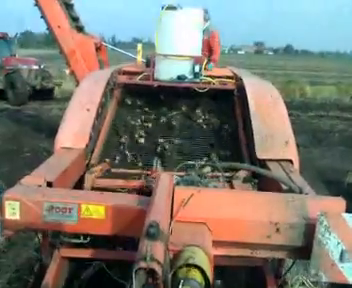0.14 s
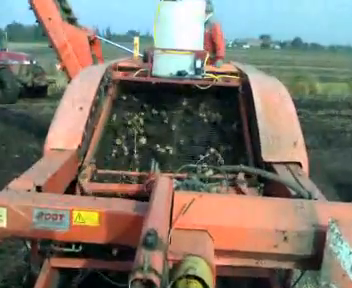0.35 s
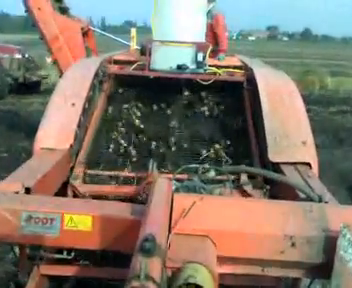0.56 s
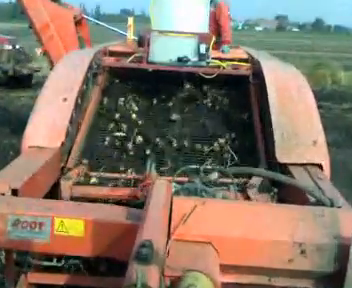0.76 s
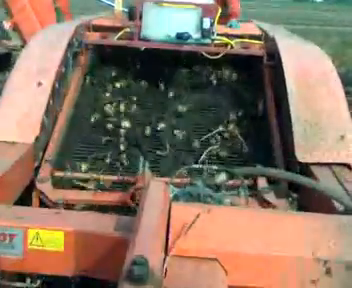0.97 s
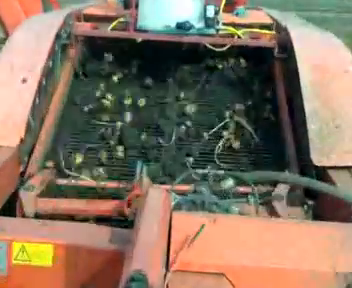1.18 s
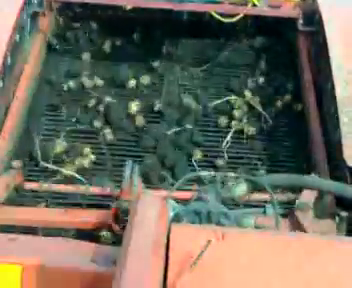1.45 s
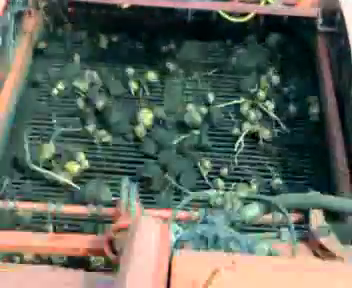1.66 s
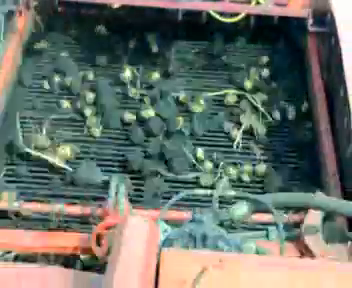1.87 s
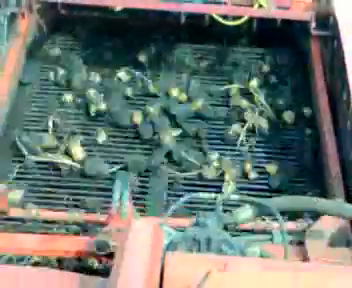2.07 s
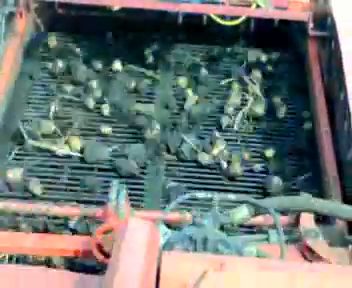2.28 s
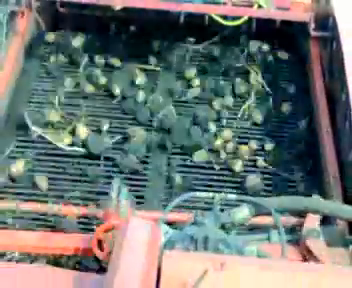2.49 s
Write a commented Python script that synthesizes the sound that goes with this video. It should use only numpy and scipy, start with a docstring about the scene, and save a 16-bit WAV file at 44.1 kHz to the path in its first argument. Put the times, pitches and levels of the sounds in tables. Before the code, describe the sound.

A six-cylinder diesel tractor drones loudly at a steady low pitch, with potato harvester roar, ringing panels, irregular metallic rattles and a few tiny stone ticks; open field, dry, close, dull slightly overloaded microphone.

```python
"""Diesel tractor pulling a potato harvester

Heard from the tractor on an open field: a six-cylinder engine hums at the firing rate, summed from cosines.
A geared tone beats slowly against its octave, and weaker cosines give uneven firing and a faint gear whine.
The machinery roars (noise bands), panels ring (resonated noise), a loose steel part rattles in bursts
(random knocks into modes) and stones tick on the web (a few touches into modes)."""
import sys
import numpy as np
from scipy import signal
from scipy.io import wavfile

SR = 44100
rng = np.random.default_rng(int(sys.argv[2]) if len(sys.argv) > 2 else 0)


def unload_wav(signal):
    """Save mono or channel-first audio to the path in sys.argv[1] as 16-bit WAV at rate SR, clipped to [-1, 1]."""
    wavfile.write(
        sys.argv[1],
        SR,
        np.round(np.clip(np.atleast_2d(signal).T, -1, 1) * 32767).astype(np.int16),
    )


N = 115542


def from_db(db):
    """Decibels to gain."""
    return 10 ** (np.asarray(db) / 20)


def rms_one(x):
    """Scale to unit rms."""
    return x / np.sqrt(np.mean(x ** 2) + 1e-20)


def in_time(rows):
    """Interpolate a (seconds, value) curve to one value per sample."""
    seconds, value = np.transpose(rows)
    return np.interp(np.arange(N) / SR, seconds, value)


def drift(corner_hz):
    """Slow random curve of unit spread: noise through a two-pole lowpass, made at every 40th sample."""
    step, settle = 40, 2000
    pole = np.exp(-2 * np.pi * corner_hz * step / SR)
    noise = rng.standard_normal(N // step + settle + 2)
    slow = signal.lfilter([1], [1, -2 * pole, pole * pole], noise)[settle:]
    return np.interp(np.arange(N) / step, np.arange(len(slow)), rms_one(slow - slow.mean()))


def ring(clicks, modes):
    """Clicks excite parallel two-pole modes, each a decaying sine."""
    out = 0
    for hz, db, t60_s in modes:
        pole = from_db(-60 / (t60_s * SR))
        w = 2 * np.pi * hz / SR
        feedback = [1, -2 * pole * np.cos(w), pole * pole]
        out = out + signal.lfilter([0, from_db(db) * np.sin(w)], feedback, clicks + 1e-18)
    return out


# Engine speed. Each row: time in seconds, firings per second.
FIRING_RATE = [(0, 80.1), (.35, 80.28), (.9, 80.03), (1.3, 80.42), (1.8, 80.35), (2.1, 79.9), (2.4, 79.3),
               (2.62, 79.6)]
CYLINDERS, FIRST_FIRING_S = 6, .005


def engine_cycle():
    """Engine phase in radians: the integrated firing rate over the cylinder count."""
    firings = np.cumsum(in_time(FIRING_RATE)) / SR - FIRST_FIRING_S * FIRING_RATE[0][1]
    return 2 * np.pi * firings / CYLINDERS


# Firing tone. Each row: time in seconds, rms level in dB.
HUM_LEVEL = [(0.05, -13), (0.2, -14.5), (0.37, -12), (0.84, -15.5), (1.46, -10.5), (1.54, -15.5),
             (1.6, -11.5), (1.82, -16), (1.96, -13), (2.03, -18), (2.19, -13), (2.55, -17)]
OCTAVE_DB, GEARED_DB = -18, -22
GEARED_ORDER, GEARED_IN_STEP_S = 12.18, .38  # order: multiple of the engine cycle


def exhaust(cycle):
    """Firing tone, its octave in antiphase to sharpen troughs, and a geared tone beating with the octave."""
    firing = CYLINDERS * cycle
    hum = from_db(in_time(HUM_LEVEL)) * np.cos(firing)
    gap = (GEARED_ORDER - 2 * CYLINDERS) * (cycle - cycle[int(GEARED_IN_STEP_S * SR)])
    octave = from_db(OCTAVE_DB) * np.cos(2 * firing)
    geared = from_db(GEARED_DB) * np.cos(2 * firing + gap)
    return np.sqrt(2) * (hum - octave - geared)


# Low tones from uneven cylinders. Each row: multiple of the engine cycle, mean level in dB.
UNEVEN_FIRING = [(3, -33), (7, -26.5), (9, -36), (11, -42), (13, -42), (15, -41)]
# Weaker engine and driveline tones. Each row: multiple of the engine cycle, mean level in dB.
DRIVELINE_TONES = [(16, -46.5), (18, -42.5), (19, -41.5), (20, -35.5), (22, -36), (23, -33.5), (24, -57),
                   (29, -35.5), (31, -44), (32, -30), (34, -33), (35, -43), (38, -40.5), (43, -39.5),
                   (44, -43), (46, -35), (47, -44.5), (53, -58), (57, -46.5), (58, -51), (60, -48.5),
                   (64, -40), (78, -43.5), (93, -37.5), (96, -38)]
# Gear whine tones, some between whole multiples of the engine cycle.
# Each row: multiple of the engine cycle, mean level in dB.
GEAR_WHINE = [(41.5, -35.5), (104.75, -38), (114, -51.5), (132.5, -43)]
TONE_WAVER_DB, TONE_WANDER_RAD = 2, .25


def driveline(cycle):
    """Weaker tones that follow the engine cycle, each wavering in level and phase."""
    out = 0
    for order, db in UNEVEN_FIRING + DRIVELINE_TONES + GEAR_WHINE:
        level = from_db(db + TONE_WAVER_DB * drift(2.22))
        phase = rng.uniform(0, 2 * np.pi) + TONE_WANDER_RAD * drift(3.3)
        out = out + np.sqrt(2) * level * np.cos(order * cycle + phase)
    return out


# Machinery roar spectrum. Each row: frequency in Hz, relative density in dB per Hz.
ROAR_SPECTRUM = [(20, -13.5), (30, -19.5), (48, -18), (62, -15.5), (108, -16), (125, -7.5), (160, -8),
                 (215, -17), (285, -15), (347, -21.5), (433, -15.5), (674, -18.5), (1100, -22), (1300, -19),
                 (1630, -27), (2500, -32), (3600, -36.5), (4500, -45), (5500, -41), (6200, -54),
                 (7300, -64.5)]
ROAR_DB, ROAR_PATCHY_DB = -20.5, 0.78
ROAR_FIRING_DB = -1.2  # negative: loudest in the troughs of the firing cosine


def roar(cycle):
    """Quarter-octave noise bands flicker partly together; those above 1 kHz puff with each firing."""
    together = drift(6)
    edges_hz = 18 * 2 ** np.arange(0, 9, 1 / 4)
    white = rng.standard_normal((2, N + SR))  # neighbouring bands take different noise
    at_hz, density_db = np.transpose(ROAR_SPECTRUM)
    puff_db = ROAR_FIRING_DB * np.cos(CYLINDERS * cycle)
    out = 0
    for k, (low, high) in enumerate(zip(edges_hz, edges_hz[1:])):
        bandpass = signal.butter(2, [low, high], "band", fs=SR, output="sos")
        band = signal.sosfilt(bandpass, white[k % 2])[SR:]
        level_db = np.interp(np.log(low * high) / 2, np.log(at_hz), density_db)
        flicker_db = ROAR_PATCHY_DB * (0.45 * together + drift(12))
        out = out + band * from_db(level_db + flicker_db + puff_db * (low > 1000))
    return from_db(ROAR_DB) * rms_one(out)


# Ringing panels. Each row: frequency in Hz, width in Hz, mean level in dB.
PANEL_MODES = [(100, 10, -27), (288.5, 17, -38.5), (462, 16, -40.5), (612, 35, -38.5), (763.6, 17, -35.5),
               (1286, 26, -38.5), (1353, 87, -40), (1481, 30, -40.5), (1760, 21, -43)]
PANEL_CLATTER_DB = 2.5


def panels():
    """Ringing panels: noise through narrow two-pole resonances, each drifting in level."""
    white = rng.standard_normal(N + SR)
    out = 0
    for hz, width_hz, db in PANEL_MODES:
        pole = np.exp(-np.pi * width_hz / SR)
        feedback = [1, -2 * pole * np.cos(2 * np.pi * hz / SR), pole * pole]
        ringing = signal.lfilter([1, 0, -1], feedback, white)[SR:]
        out = out + from_db(db + PANEL_CLATTER_DB * drift(7.5)) * rms_one(ringing)
    return out


# Rattle bursts of the loose part. Each row: time in seconds, level in dB.
RATTLE_LEVEL = [(0.0, -29), (0.03, -47), (0.17, -45), (0.2, -36), (0.23, -35), (0.29, -49), (0.34, -37.5),
                (0.36, -47), (0.64, -47), (0.69, -34.5), (0.74, -44), (0.85, -73), (0.97, -42), (1.06, -50),
                (1.1, -37), (1.12, -50), (1.34, -43), (1.41, -39), (1.47, -48), (1.52, -33.5), (1.55, -46),
                (1.77, -45), (1.8, -53), (1.9, -35.5), (1.95, -42), (1.99, -32.5), (2.02, -41), (2.05, -34),
                (2.08, -45), (2.12, -38), (2.14, -48), (2.18, -42), (2.22, -47), (2.25, -41), (2.3, -43),
                (2.33, -33.5), (2.41, -51), (2.52, -38), (2.57, -49), (2.62, -45)]
# Modes of the loose part. Each row: frequency in Hz, relative level in dB, t60 in seconds.
PART_MODES = [(3520, -9, .04), (3870, 0, .08), (3950, 0, .06), (4030, -5, .04)]
KNOCKS_PER_S, KNOCK_SPREAD_DB = 700, 1.5


def rattle():
    """Random knocks of uneven size and either sign ring the loose steel part."""
    size_db = KNOCK_SPREAD_DB * np.minimum(rng.exponential(1, N), 4)
    sizes = from_db(size_db) * rng.choice([-1, 1], N)
    knocks = sizes * (rng.random(N) < KNOCKS_PER_S / SR)
    return rms_one(ring(knocks, PART_MODES)) * from_db(in_time(RATTLE_LEVEL))


# Stones ticking on the web. Each row: start in seconds, level in dB before random touch strength.
STONE_TICKS = [(.3386, -29), (.411, -37), (1.2027, -39), (1.3763, -29), (1.4144, -34)]
# Modes of the struck rod. Each row: frequency in Hz, level in dB, t60 in seconds.
ROD_MODES = [(4100, -7, .012), (4700, -9, .01), (5150, -6, .015), (5450, -5, .015), (5900, -8, .01)]


def ticks():
    """Short bright scuffs on a rod: four touches within 4 ms, the same pattern each time."""
    start_s, db = np.transpose(STONE_TICKS)
    clicks = np.zeros(N)
    for late_s, strength in rng.uniform([0, -1], [.004, 1], (4, 2)):
        clicks[((start_s + late_s) * SR).astype(int)] += strength * from_db(db)
    return ring(clicks, ROD_MODES)


def scene():
    """Sum all sources, dry in the open."""
    cycle = engine_cycle()
    machinery = roar(cycle) + panels()
    return (exhaust(cycle) + driveline(cycle) + machinery + rattle() + ticks())[None]


MIC_ROLLOFF_HZ, CUTOFF_HZ = 5560, 7440
PEAK_LIMIT, OFFSET = .9, -.018


def record(dry):
    """The microphone dulls the treble, peaks are rounded, a small offset is added, the top is cut."""
    dull = signal.sosfilt(signal.butter(3, MIC_ROLLOFF_HZ, fs=SR, output="sos"), dry)
    rounded = PEAK_LIMIT * np.tanh(dull / PEAK_LIMIT)
    steep = signal.ellip(16, .5, 70, CUTOFF_HZ, fs=SR, output="sos")
    return signal.sosfilt(steep, rounded + OFFSET)


dry = scene()
out = record(dry)
unload_wav(out)
```